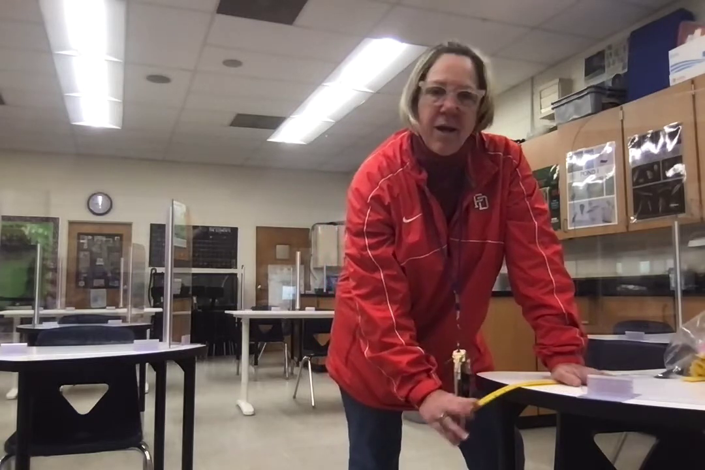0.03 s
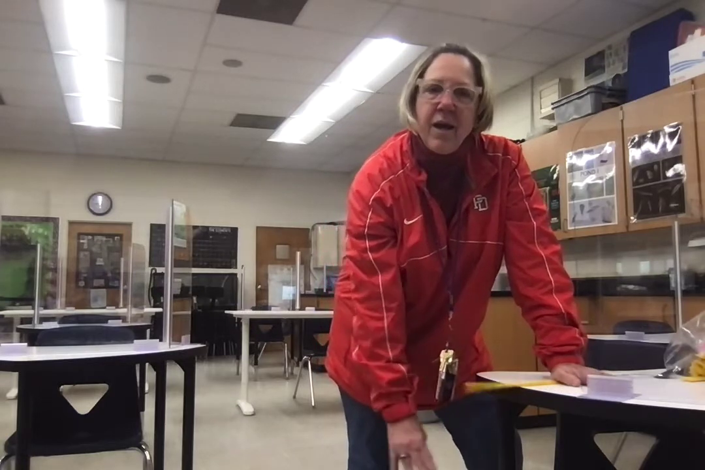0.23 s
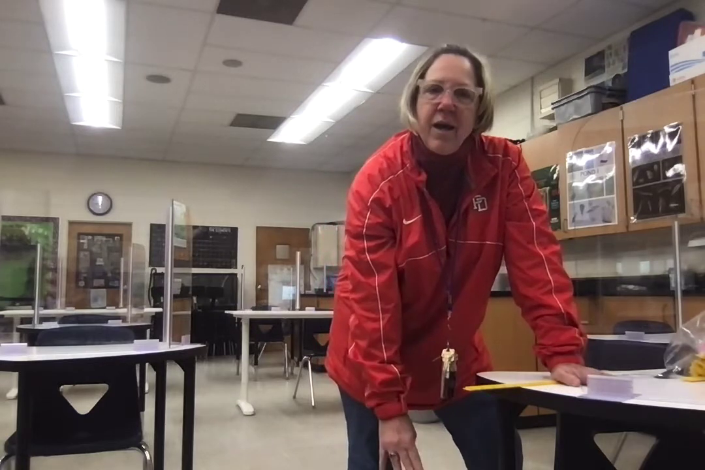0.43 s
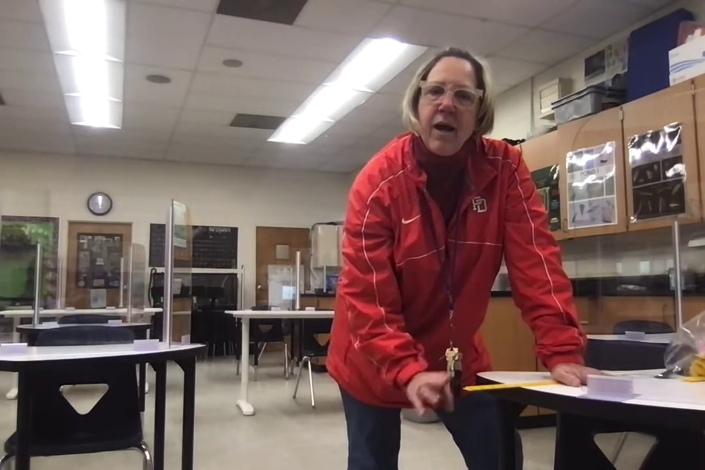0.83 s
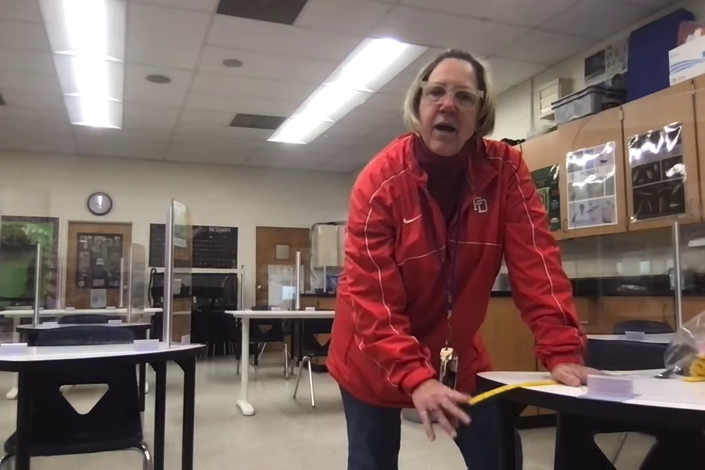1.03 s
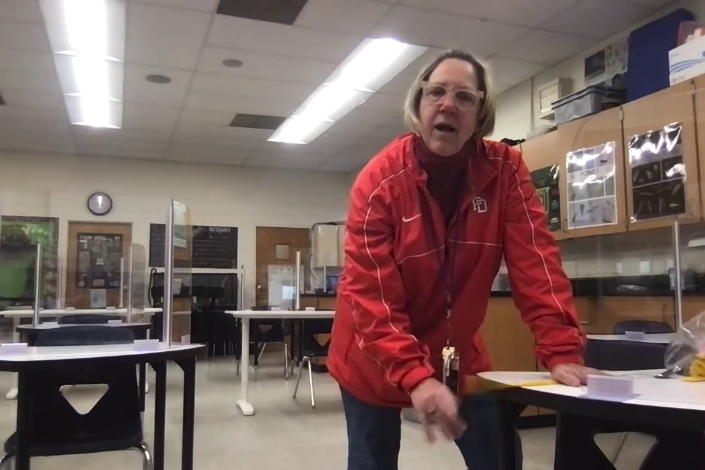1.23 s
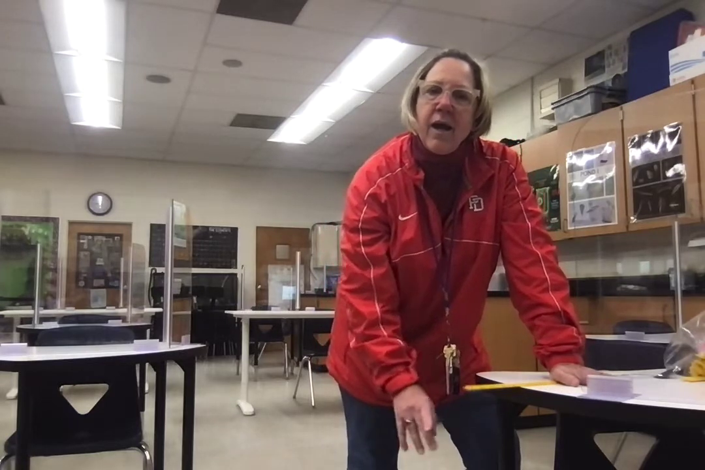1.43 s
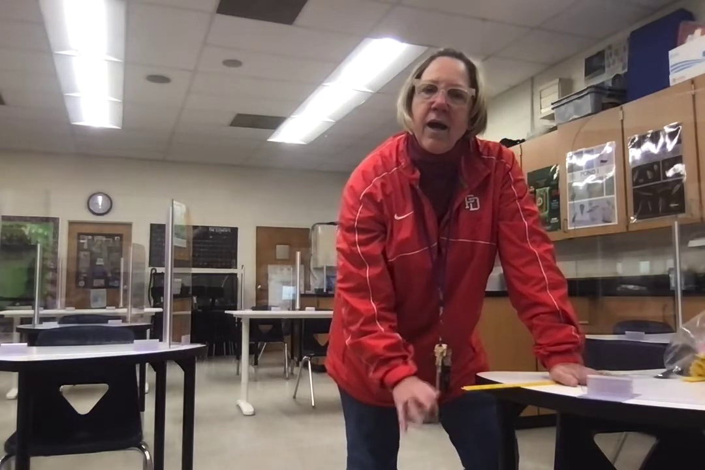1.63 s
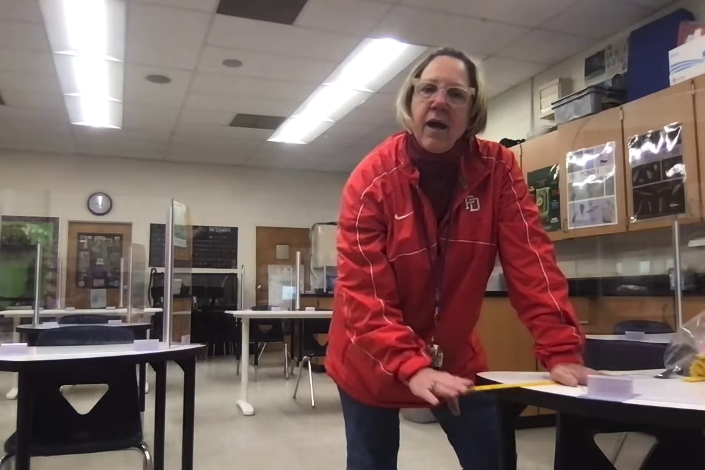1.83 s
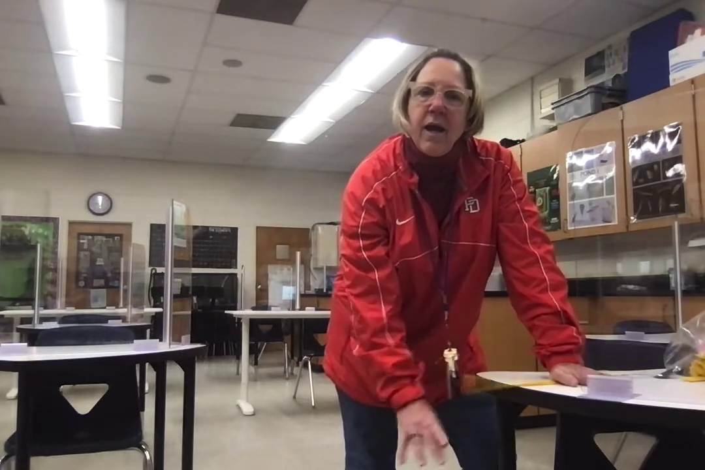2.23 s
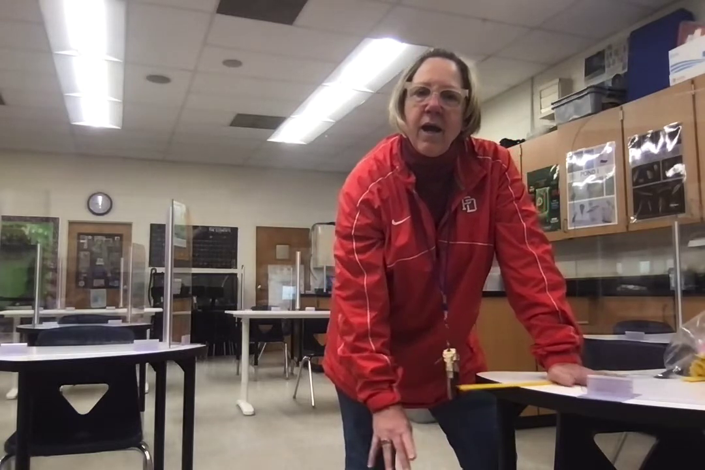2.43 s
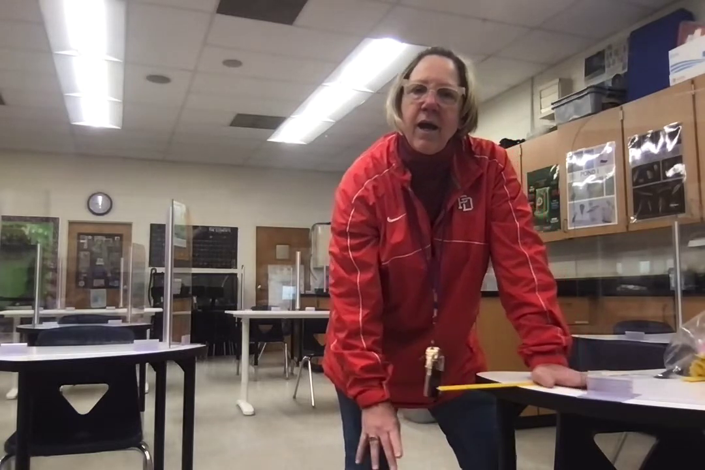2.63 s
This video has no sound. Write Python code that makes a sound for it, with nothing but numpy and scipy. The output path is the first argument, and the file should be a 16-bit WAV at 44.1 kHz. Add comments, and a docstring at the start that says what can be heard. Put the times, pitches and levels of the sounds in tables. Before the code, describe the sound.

A plastic ruler flicked over a table edge twangs three times near the microphone. At 0.1 seconds it rattles against the table in a rapid run of sharp, hollow slaps that fade quickly. A softer twang follows at 1.3 seconds, and the last, ringing longest, at 2.2 seconds. Low ventilation rumbles throughout the slightly echoing classroom, with a very faint sleeve swish around 0.5 seconds.

```python
"""A quiet classroom, one microphone near a ruler held over a table edge. Ventilation rumbles throughout.
A sleeve swishes, and at 0.1 s a finger slips off the tip: the ruler slaps the table once per swing,
ever faster and softer, each slap cracking, ringing the ruler and knocking the table top.
A near surface and the room answer. The sleeve swishes once more, then a finger lightly touches the
ruler before a second, softer flick at 1.3 s. The last, which rings longest, comes at 2.2 s."""
import sys
import numpy as np
from scipy import signal
from scipy.fft import rfft, irfft, next_fast_len
from scipy.io import wavfile
from scipy.ndimage import uniform_filter1d, map_coordinates

SR = 44100
rng = np.random.default_rng(int(sys.argv[2]) if len(sys.argv) > 2 else 0)


def unload_audio(sound):
    """Save the sound as a 16-bit wav file, at the path given as the first command line argument."""
    columns = np.transpose(np.atleast_2d(sound))
    # keep every value between -1 and 1, then stretch to whole-number steps
    steps = np.round(np.clip(columns, -1, 1) * 32767)
    wavfile.write(sys.argv[1], SR, steps.astype(np.int16))


N = 123479

SLIP_LEAD_S, SLIP_T60_S, SLIP_ATTACK_S = 0.033, 0.059, 0.00096
SLIP_RING_DB, SLIP_KNOCK_DB = -11, -10.5  # relative to the first slap
SWING_SHRINK = 0.97  # each swing's length over the one before
CLICK_DB, CLATTER_DB, CLATTER_T60_S = 19.5, 2.5, 0.04
KNOCK_T60_S, KNOCK_FADE_SHARE = 0.064, 0.54  # the knock fades more slowly than the crack
HOLD_S, SETTLE_DB_PER_S = 0.017, 134  # wait before the slaps fade; extra fade after the hard rattle
# The three flicks (first slap [s], ring [dB], crack [dB], knock [dB], finger slip [dB],
# first swing [s], ring fade [dB/s], crack fade [dB/s], hard rattle length [s])
FLICKS = [(0.1166, -28, -29.5, -41, -45.5, .0379, 53, 156, 0.15),
          (1.2912, -35, -41.5, -47.5, -53, .0357, 61.5, 179.5, 0.13),
          (2.1831, -29, -32.5, -45, -48, .0366, 31.5, 111.5, 0.16)]
def twang(start, ring_db, crack_db, knock_db, slip_db, swing, ring_fade, crack_fade, rattle):
    """The finger slips off, then the ruler slaps the table once per swing; the ring outlasts the crack."""
    rings, contact, push = np.zeros((3, N))
    t = np.arange(SR // 6) / SR
    slip = start - SLIP_LEAD_S
    add(contact, slip, amp(slip_db) * burst(t, SLIP_T60_S) * (1 - np.exp(-t / SLIP_ATTACK_S)))
    add(rings, slip, amp(ring_db + SLIP_RING_DB) * ruler_ring(t))
    add(push, slip, amp(knock_db + SLIP_KNOCK_DB) * burst(t, KNOCK_T60_S))
    for k in range(12):
        age = swing * np.sum(SWING_SHRINK ** np.arange(k))
        settled_db = SETTLE_DB_PER_S * max(age - rattle, 0)
        fading_s = max(age - HOLD_S, 0)
        slap = amp(CLATTER_DB) * burst(t, CLATTER_T60_S)
        slap[0] = amp(CLICK_DB)
        add(contact, start + age, amp(crack_db - crack_fade * fading_s - settled_db) * slap)
        add(rings, start + age, amp(ring_db - ring_fade * fading_s - settled_db) * ruler_ring(t, age))
        push_db = knock_db - KNOCK_FADE_SHARE * crack_fade * fading_s - settled_db
        add(push, start + age, amp(push_db) * burst(t, KNOCK_T60_S))
    impacts = crack(contact) + table_knock(push)
    return classroom(impacts) + classroom(rings, echo_db=-18, room_db=-8)


RING_ATTACK_S, MELLOW_DB_PER_OCTAVE_S, MELLOW_FROM_HZ = 0.0037, 11, 920
# The ruler's modes (frequency [Hz], level [dB], t60 [s])
RULER_MODES = [(778.3, -18, .11), (870.4, -18, 0.14), (1109.3, 0.5, 0.045), (1073, -11, 0.062),
               (1234, -7.5, 0.052), (1451, -21, 0.094), (1810, -8.5, 0.037), (1972, -10.5, 0.055),
               (2118, 1, 0.036), (2960, -21, 0.038), (3246, -1, .032), (4590, -15, 0.056)]
def ruler_ring(t, age=0, scatter_db=2.3, detune=0.0066):
    """The modes swell, a little different at each contact; later slaps reach the high ones less."""
    hz, db, t60 = np.transpose(RULER_MODES)[:, :, None]
    size, pitch = rng.standard_normal((2, len(hz), 1))
    mellow_db = MELLOW_DB_PER_OCTAVE_S * age * np.maximum(np.log2(hz / MELLOW_FROM_HZ), 0)
    envelopes = amp(db + scatter_db * size - mellow_db) * decay(t, t60)
    partials = envelopes * np.sin(2 * np.pi * hz * (1 + detune * pitch) * t)
    return partials.sum(0) * (1 - np.exp(-(t / RING_ATTACK_S) ** 2))


# Colour of plastic striking the table (frequency [Hz], level [dB])
CRACK_SPECTRUM = [(150, -17.5), (270, -2), (360, -8.5), (510, 0), (600, -12), (700, -7.5), (860, -11),
                  (1200, 2.5), (1560, -9.5), (2100, -1), (2650, -7), (3300, 2), (4000, -6.5), (5500, -7.5),
                  (9500, -14), (11500, -13.5), (16000, -24.5)]
def crack(contact):
    """The contact force sounds as a bright crack."""
    return signal.fftconvolve(contact, click(CRACK_SPECTRUM))[:N]


# Response of the table top (frequency [Hz], level [dB])
KNOCK_SPECTRUM = [(150, -38), (260, -12), (380, -1.5), (450, -5.5), (530, -8), (620, -23), (1000, -55.5),
                  (4000, -66.5)]
def table_knock(push):
    """The table top answers each push with a hollow knock."""
    return signal.fftconvolve(push, click(KNOCK_SPECTRUM))[:N]


# Two sleeve swishes, then a finger touching the ruler (time [s], length [s], level [dB])
HAND_MOVES = [(0.039, .036, -71.5), (0.416, 0.18, -69.5), (1.028, 0.036, -78)]
# Colour of soft rubbing (frequency [Hz], level [dB])
RUB_SPECTRUM = [(300, -15), (1200, -4), (2400, -1), (4500, -12.5), (9000, -21), (15000, -28)]
def handling():
    """Faint at the microphone, a jacket sleeve swishes twice and a finger lands lightly on the ruler."""
    level = np.zeros(N)
    for start, length, db in HAND_MOVES:
        add(level, start, amp(db) * np.hanning(int(length * SR)))
    return level * noise(RUB_SPECTRUM)


ECHO_S, ROOM_BUILD_S = 0.0105, 0.0027  # the echo travels 3.6 m further than the direct sound
# The classroom's reverberation (frequency [Hz], t60 [s])
ROOM_DECAY = [(200, 0.66), (500, .72), (1100, 0.47), (2100, 0.6), (3500, 0.45), (7000, .44), (15000, 0.25)]
def classroom(x, echo_db=-4.5, room_db=-2):
    """At the microphone: direct sound, the nearest hard surface's echo, a tail whose treble dies first."""
    hz, t, bands = signal.stft(rng.standard_normal(SR), SR, nperseg=256)
    envelopes = decay(t, along(ROOM_DECAY, hz)[:, None]) * (1 - np.exp(-t / ROOM_BUILD_S))
    tail = signal.istft(bands * envelopes, SR, nperseg=256)[1]
    response = amp(room_db) * tail / np.linalg.norm(tail)
    response[0] += 1
    response[round(ECHO_S * SR)] += amp(echo_db)
    return signal.fftconvolve(x, response)[:N]


DUCT_DB, HUM_HZ, HUM_DB, HUM_WAVER_DB = -51, 102.3, -58.5, -5.5
# Colour of the air in the ducts (frequency [Hz], level [dB])
DUCT_SPECTRUM = [(20, -23), (32, -8.5), (48, -6), (85, -2.5), (115, -5.5), (160, -14.5), (250, -23),
                 (400, -34.5), (640, -40.5), (760, -39.5), (805, -32.5), (860, -46.5), (980, -46.5),
                 (1180, -45.5), (1245, -34), (1320, -48.5), (1600, -50), (4000, -56), (9000, -64),
                 (16000, -71.5)]
def ventilation(waver_hz=7):
    """The room tone: duct rumble with a wavering fan hum."""
    t = np.arange(N) / SR
    waver = map_coordinates(rng.standard_normal(256), [t * waver_hz], mode="wrap")
    hum = np.sqrt(2) * np.sin(2 * np.pi * HUM_HZ * t) * amp(HUM_DB + HUM_WAVER_DB * waver)
    return amp(DUCT_DB) * noise(DUCT_SPECTRUM) + hum


def amp(db):
    """Decibels to gain."""
    return 10 ** (np.asarray(db) / 20)


def unit(x):
    """Scaled to rms 1."""
    return x / np.sqrt(np.mean(x ** 2) + 1e-20)


def along(points, hz):
    """Interpolates (frequency [Hz], value) points on a log axis."""
    f, v = np.transpose(points)
    return np.interp(np.log(hz + 1), np.log(f + 1), v)


def noise(spectrum, patchy_db=1.5):
    """Coloured noise of rms 1 with gentle patches of random gain."""
    bands = signal.stft(rng.standard_normal(N), nperseg=512)[2]
    patches = uniform_filter1d(rng.standard_normal(bands.shape), size=6, axis=0)
    patches = uniform_filter1d(patches, size=16, axis=1)
    patchy = signal.istft(bands * amp(patchy_db * unit(patches)), nperseg=512)[1][:N]
    size = next_fast_len(N + SR // 2)
    colour = amp(along(spectrum, np.fft.rfftfreq(size, 1 / SR)))
    return unit(irfft(rfft(patchy, size) * colour, size)[:N])


def click(spectrum, size=2048):
    """A minimum-phase click of energy 1 with the given colour."""
    cepstrum = irfft(np.log(amp(along(spectrum, np.fft.rfftfreq(size, 1 / SR)))))
    cepstrum[1:size // 2] *= 2
    cepstrum[size // 2 + 1:] = 0
    pulse = irfft(np.exp(rfft(cepstrum)))
    return pulse / np.linalg.norm(pulse)


def decay(t, t60):
    """Falls by 60 dB in t60."""
    return np.exp(-np.log(1000) * t / t60)


def burst(t, t60):
    """White noise dying away."""
    return rng.standard_normal(len(t)) * decay(t, t60)


def add(track, start, sound):
    """Mixes a sound in at start [s]."""
    part = track[max(round(start * SR), 0):][:len(sound)]
    part += sound[:len(part)]


def scene():
    """Three twangs and soft handling over the room tone, in mono."""
    room_tone = ventilation()
    twangs = sum(twang(*flick) for flick in FLICKS)
    return (room_tone + twangs + classroom(handling()))[None]


def record(dry, top_hz=16100):
    """The microphone's signal is cut off steeply above top_hz."""
    return signal.sosfilt(signal.cheby1(14, 0.2, top_hz, fs=SR, output="sos"), dry)


dry = scene()
out = record(dry)
unload_audio(out)
```